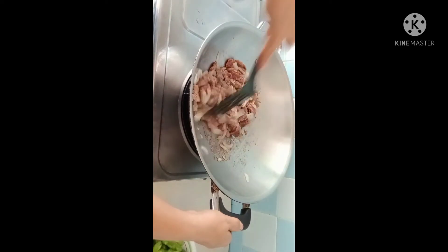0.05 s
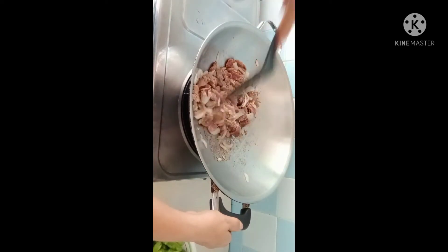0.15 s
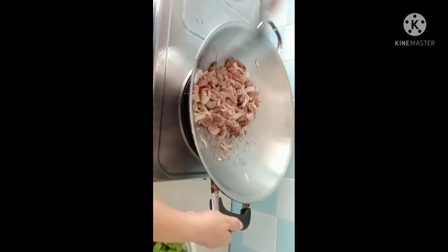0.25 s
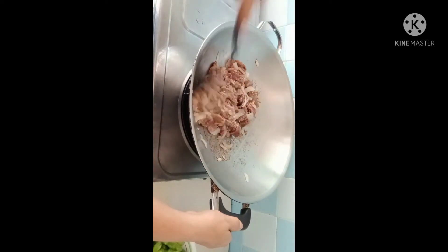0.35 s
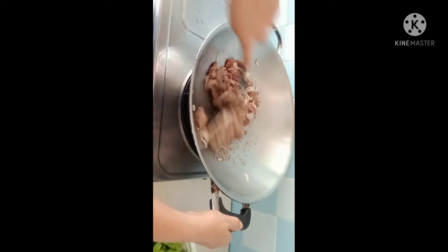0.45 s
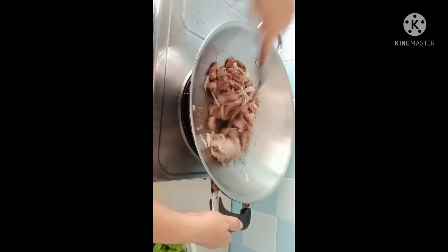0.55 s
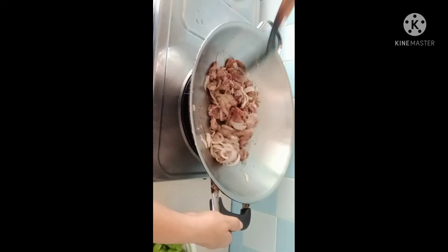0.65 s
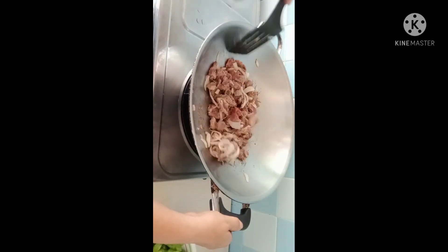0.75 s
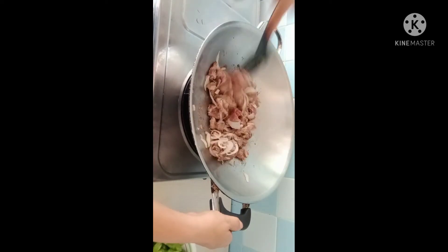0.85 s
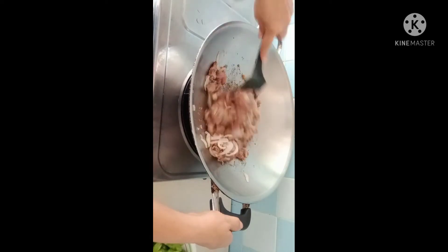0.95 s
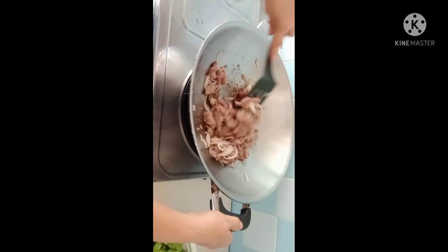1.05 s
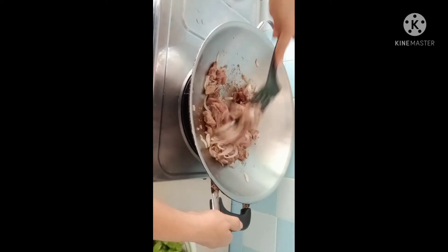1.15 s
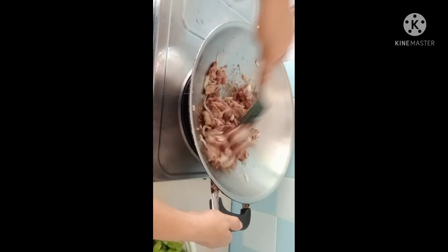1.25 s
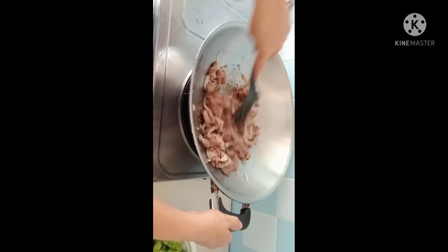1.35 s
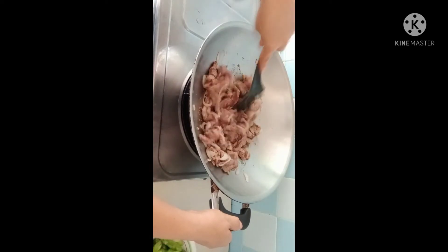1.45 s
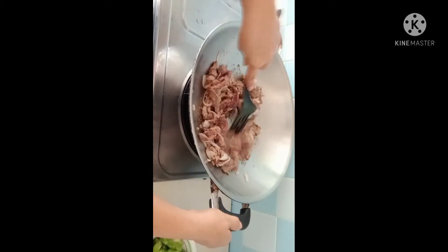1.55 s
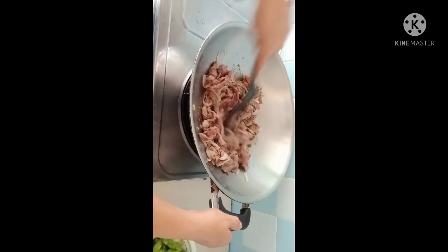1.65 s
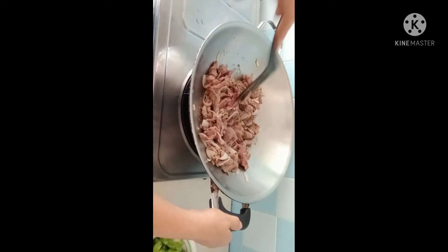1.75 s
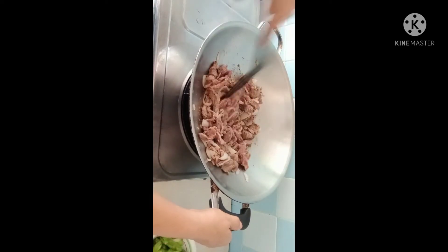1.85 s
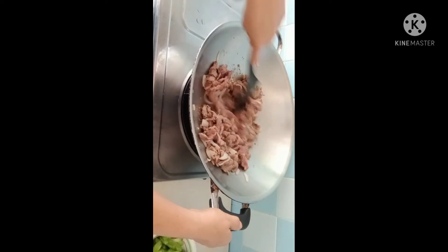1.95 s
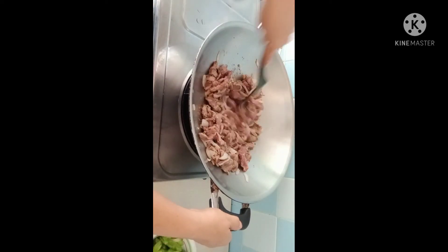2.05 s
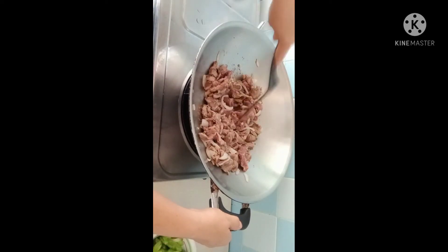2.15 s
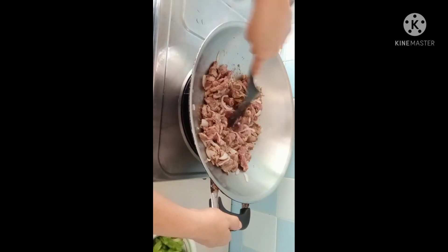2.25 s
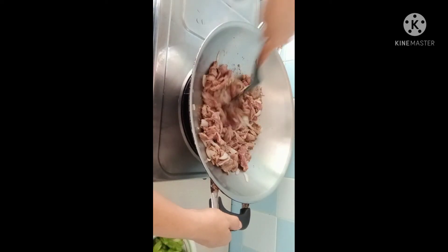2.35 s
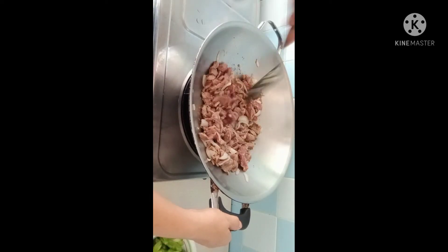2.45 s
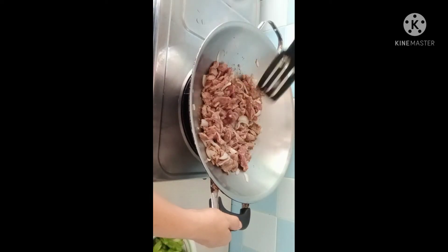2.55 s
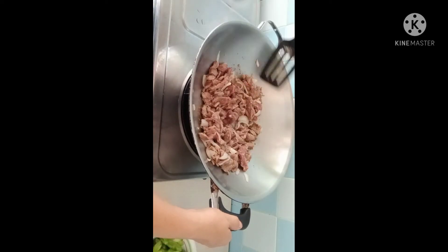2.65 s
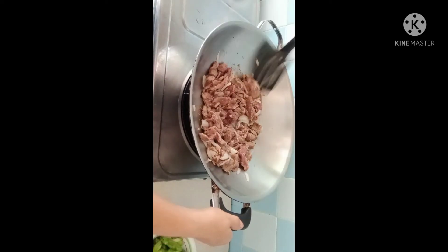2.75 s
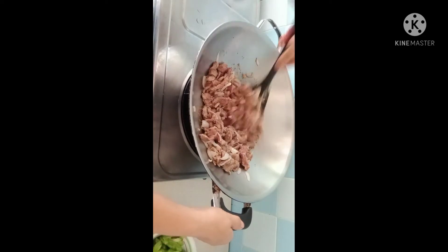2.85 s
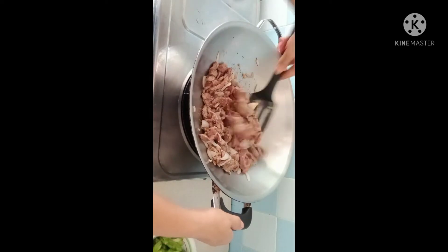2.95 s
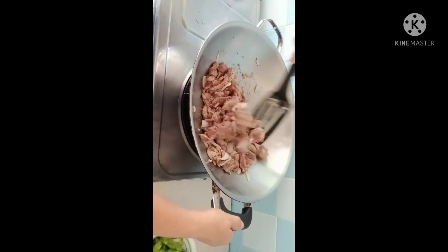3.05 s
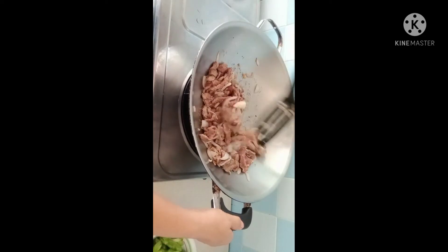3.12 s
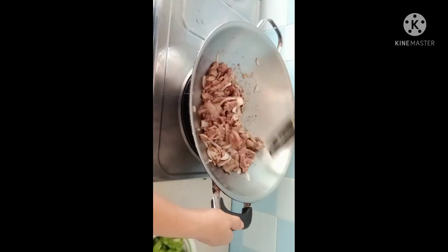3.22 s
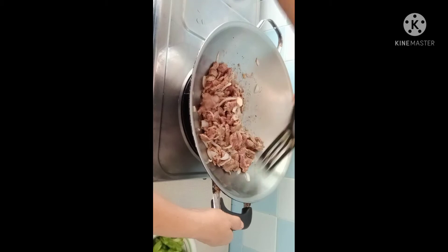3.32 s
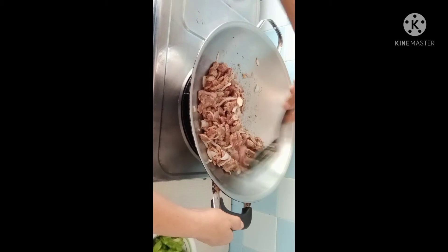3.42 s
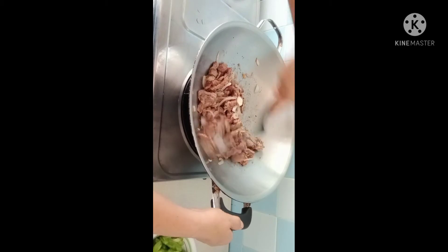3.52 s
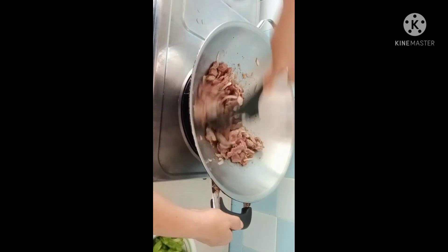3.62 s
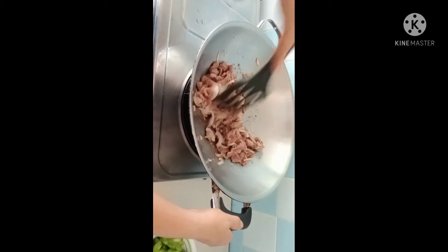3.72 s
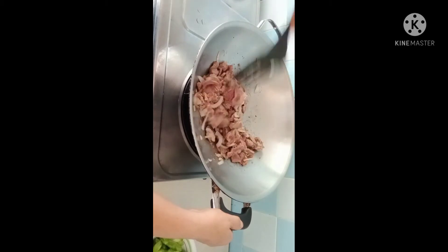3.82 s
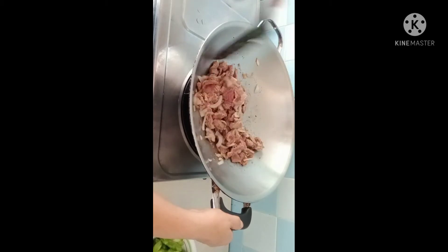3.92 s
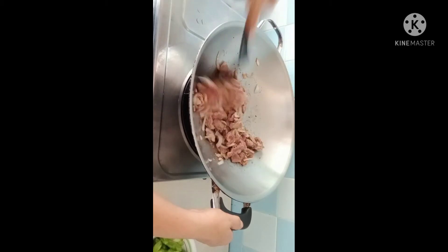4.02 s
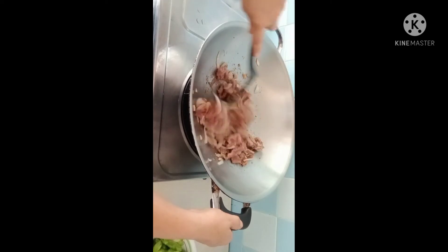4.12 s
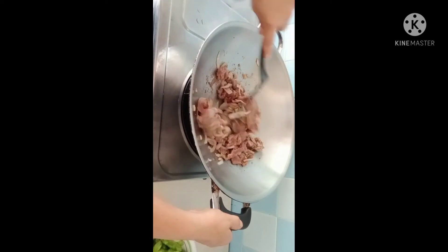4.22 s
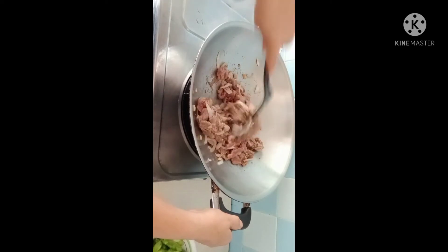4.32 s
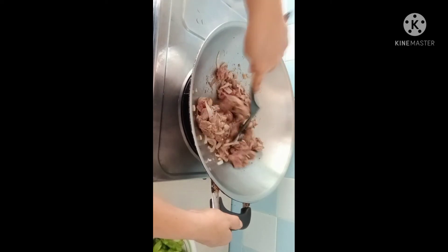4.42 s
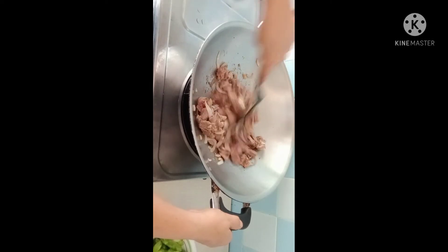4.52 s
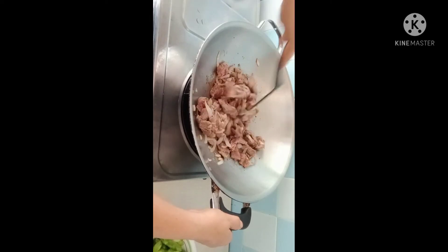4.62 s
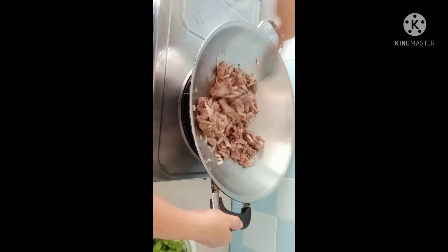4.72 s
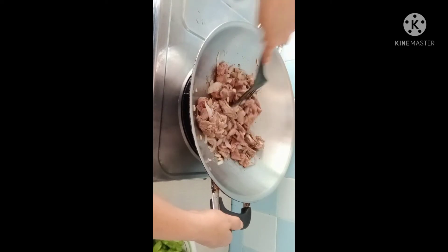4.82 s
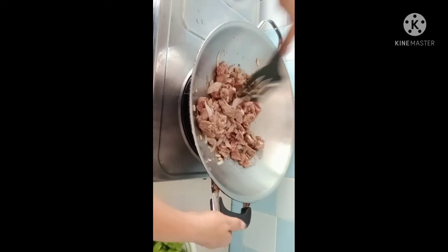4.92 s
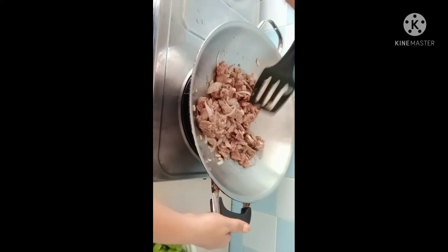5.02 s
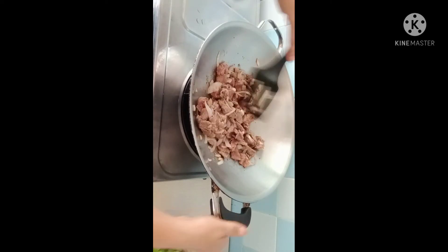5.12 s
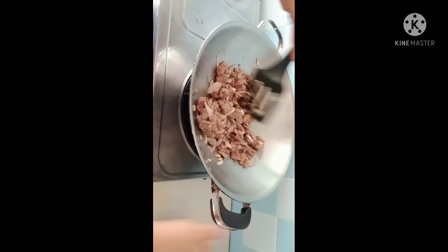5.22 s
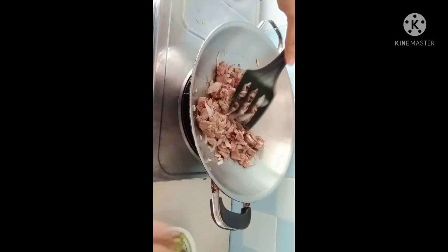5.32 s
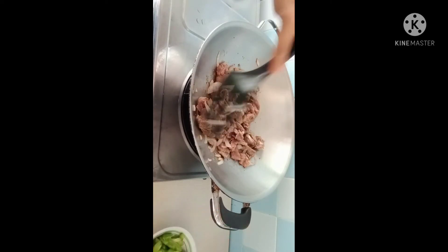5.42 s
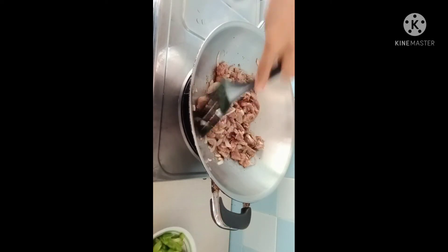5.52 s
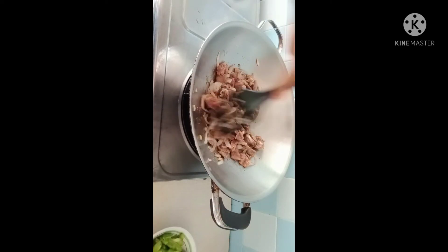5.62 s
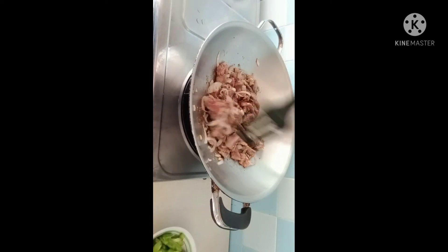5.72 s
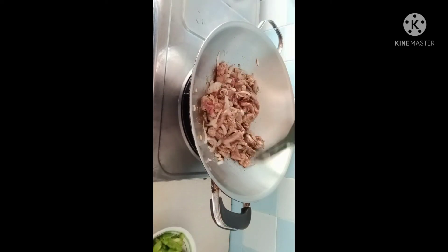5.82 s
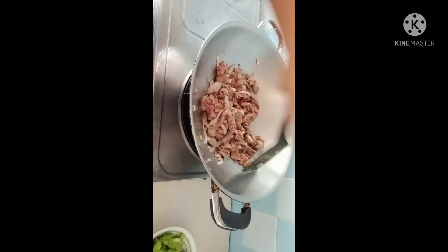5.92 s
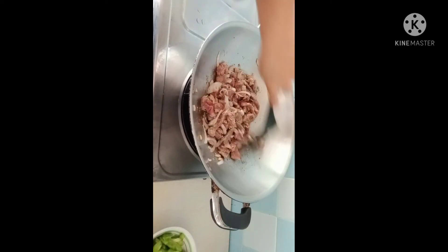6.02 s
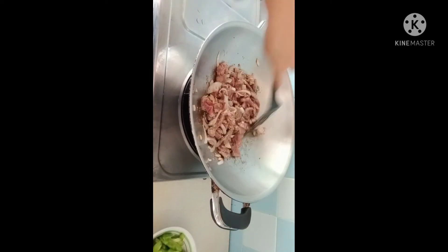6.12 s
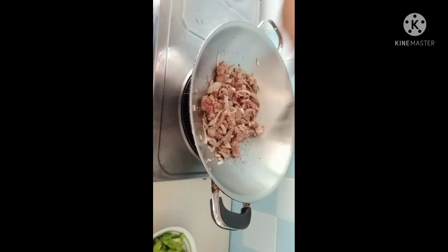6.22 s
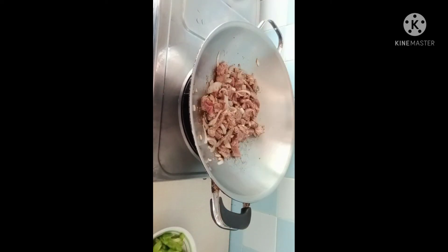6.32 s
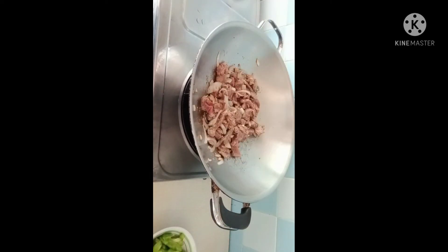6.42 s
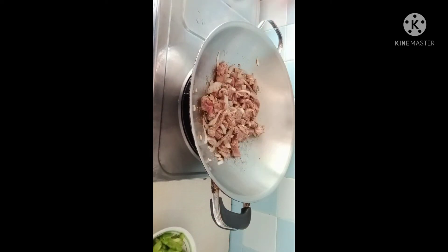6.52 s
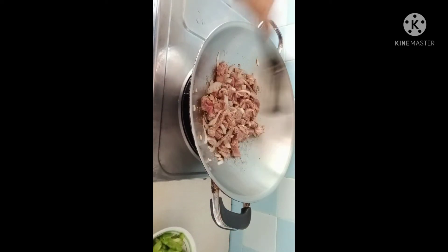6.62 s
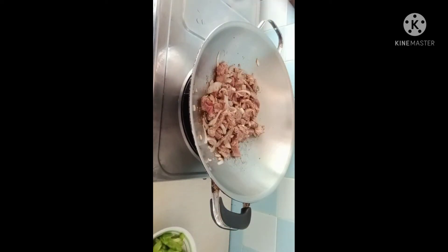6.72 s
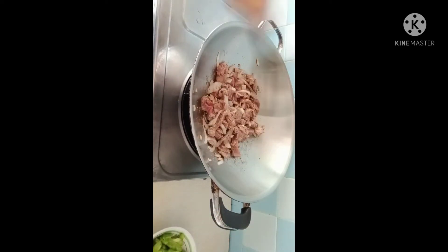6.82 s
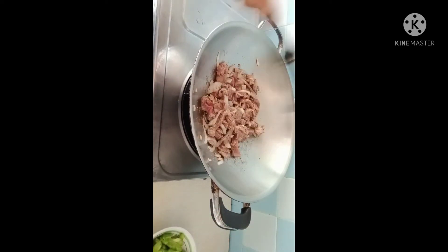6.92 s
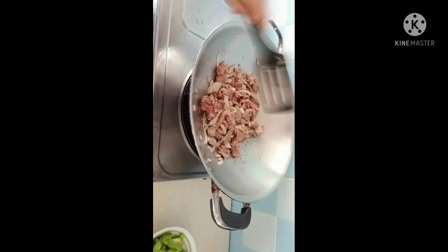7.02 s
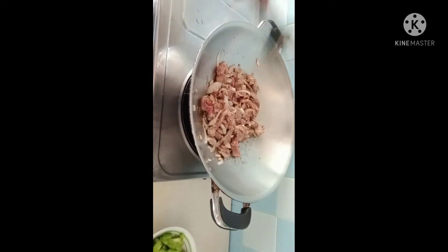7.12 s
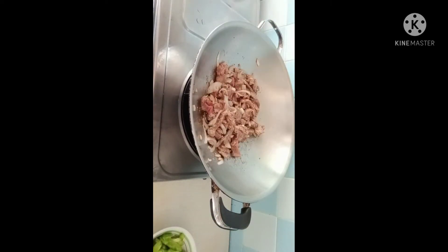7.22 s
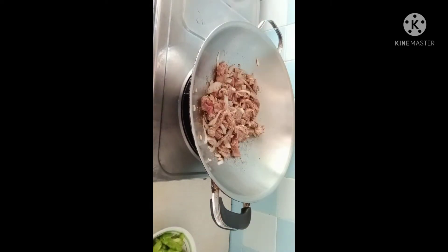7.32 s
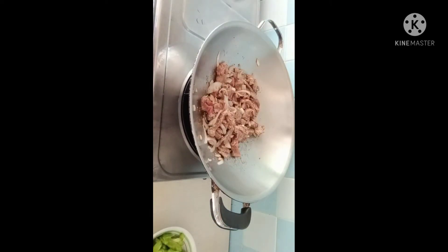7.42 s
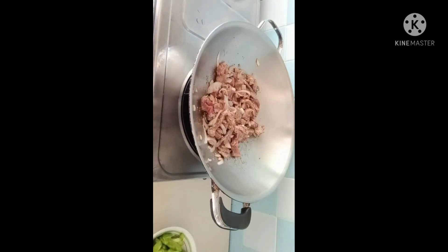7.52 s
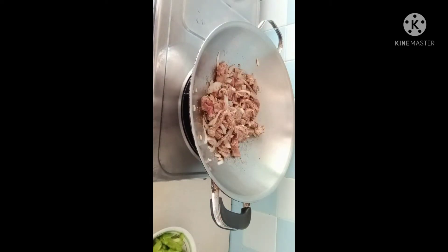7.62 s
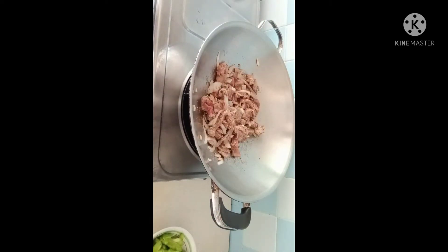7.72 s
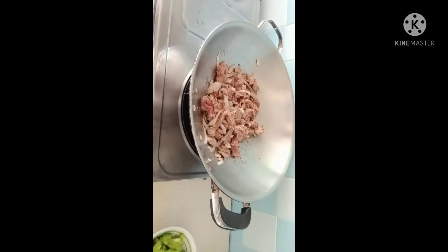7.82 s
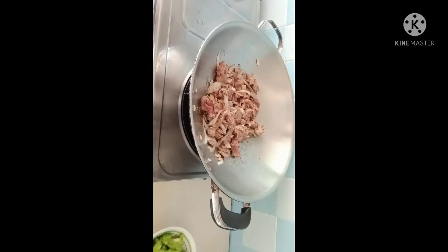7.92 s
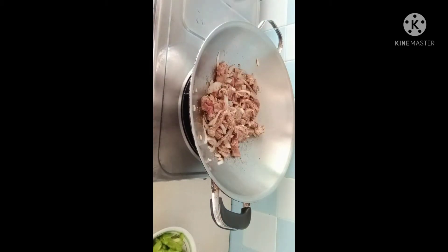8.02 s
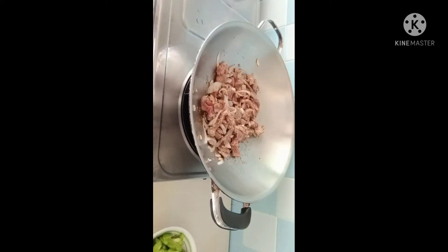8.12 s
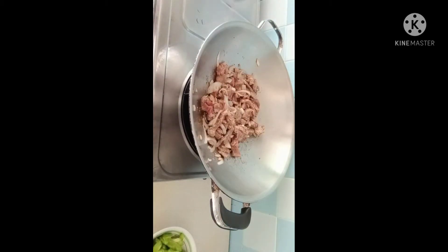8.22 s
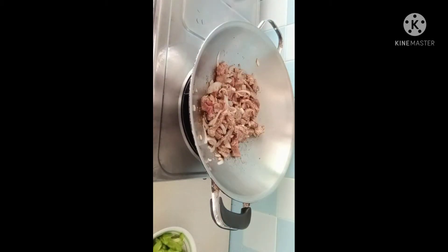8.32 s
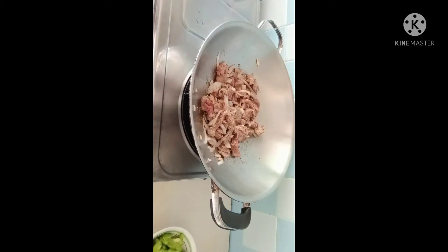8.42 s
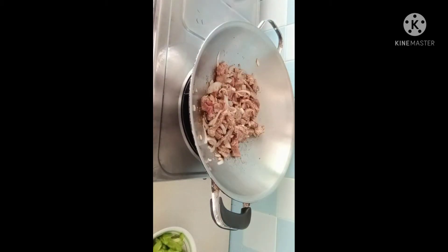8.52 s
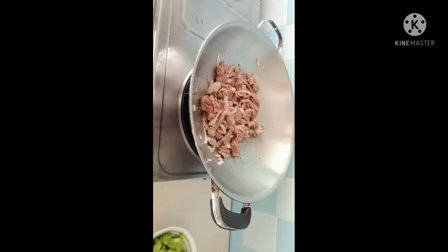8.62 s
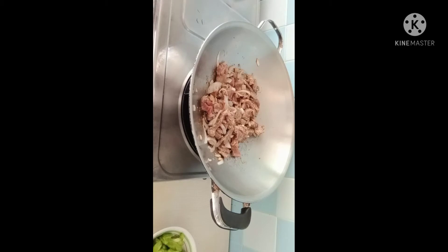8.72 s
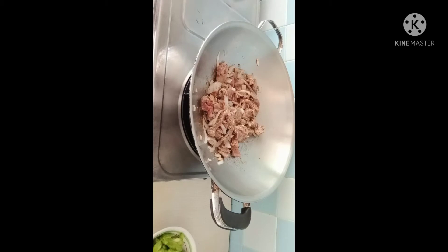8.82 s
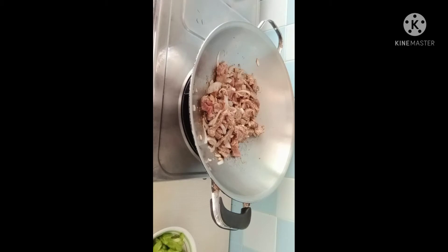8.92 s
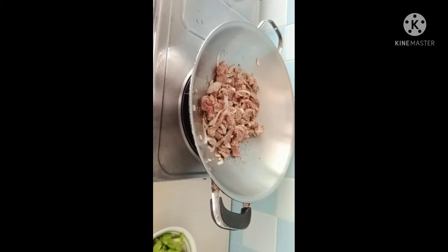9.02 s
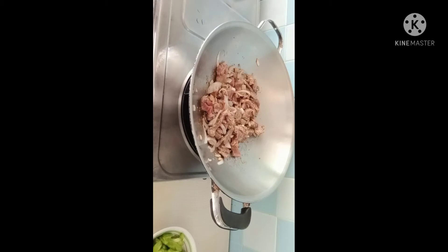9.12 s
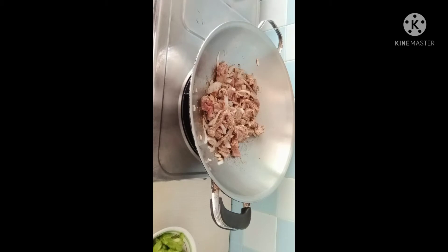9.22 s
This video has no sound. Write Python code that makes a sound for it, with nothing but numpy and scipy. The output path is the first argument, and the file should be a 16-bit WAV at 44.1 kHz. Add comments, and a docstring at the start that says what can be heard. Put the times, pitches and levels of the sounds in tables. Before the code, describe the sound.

A spatula scrapes and clinks against a steel wok over sizzling meat, then clatters down, leaving a faint simmer and a few knocks.

```python
"""Meat is stir-fried in a steel wok, close to a mono phone in a small tiled kitchen.
Motors hum throughout in slowly beating pairs of tones. From the start the spatula scrapes and knocks
the pan, each time setting off a beating ring near 1250 Hz, and fat gushes into sizzle and spits as the
food is turned. Around 6 s the spatula is laid down with a clatter and the frying sinks to a faint
simmer. From 8 s on, things are shifted on the stove top with knocks and dull bumps."""
import sys
import numpy as np
from scipy import signal
from scipy.fft import rfft, irfft, next_fast_len
from scipy.io import wavfile

SR = 44100
rng = np.random.default_rng(int(sys.argv[2]) if len(sys.argv) > 2 else 0)


def output_pcm(signal):
    """Save a mono or channel-first signal as 16-bit PCM at the path in sys.argv[1].

    Samples are clipped to [-1, 1] before scaling.
    """
    pcm = np.clip(np.atleast_2d(signal).T, -1, 1) * 32767
    wavfile.write(sys.argv[1], SR, np.round(pcm).astype(np.int16))


N = 408366
TIME = np.arange(N) / SR

# motor tones; close pairs beat and swell together at crest_s: pitch_hz, level_db, crest_s
MOTOR_TONES = [(100.04, -71.3, .298), (97.35, -73, .298), (106.3, -79.4, 0), (120.77, -81.7, 0),
               (200.09, -73, 0), (235.97, -69.3, .11), (230.28, -71.8, .11), (250.99, -77.7, 0)]
# tone colour of the room air: frequency_hz, level_db
AIR_SPECTRUM = [(18, -51.5), (30, -13), (43, -19), (96, -9.5), (150, -11.5), (225, -7), (345, -16.5),
                (1070, -19.5), (1260, -12), (1410, -20), (2500, -17.5), (3250, -16), (5500, -120)]
# dull bumps carried through the stove: start_s, level_db, pitch_hz
STOVE_BUMPS = [(0.459, -44.5, 237.5), (0.859, -48, 156.7), (0.929, -43.5, 119), (3.791, -51, 231),
               (4.028, -47, 111), (4.038, -48, 227.8), (6.03, -44, 320), (6.081, -45, 253.5),
               (7.125, -55, 205), (7.149, -55, 129), (8.069, -52, 256.5), (8.111, -49, 102),
               (8.711, -42.5, 232), (8.79, -46.5, 110.6), (8.858, -38, 241), (8.891, -38.5, 280),
               (9.048, -52, 244)]
# modes of the wok's bowl and its rim: pitch_hz, level_db, t60_s
BOWL_MODES = [(305.1, 3, 0.15), (353, 0, 0.051), (414.3, 2.5, 0.32), (443.7, 0, 0.18), (508, 0.5, 0.19),
              (550, -5.5, 0.34), (595.7, 0.5, 0.3), (660.6, 7, 0.065), (758.6, 0, 0.13), (824, 1, 0.24),
              (897, 6.5, 0.05), (968, 2.5, 0.092), (1070, -6.5, 0.21)]
RIM_MODES = [(1670, 6, 0.16), (1883, 3, 0.157), (2043, 7.5, 0.16), (2384, 2.5, 0.15), (2820, -0.5, 0.089),
             (2964, 1.5, 0.061), (3107, -1, .1), (3450, -4.5, 0.11), (3784.4, -1.5, 0.21),
             (4264, -1, 0.097), (4100, -4.5, 0.13), (4550, -4, 0.118), (4663, -3, 0.3), (4730, -7, 0.194),
             (5100, -4, 0.14), (5470, -1, 0.1), (5880, 0.5, 0.13), (7030, 5, 0.16), (7370, 4, 0.1)]
# a beating ring near 1250 Hz that every knock and scrape sets off: pitch_hz, level_db, t60_s
NEAR_RING_MODES = [(1099, -15, 0.15), (1234, -1, 0.3), (1269, 0, 0.36), (1295, -6, 0.13), (1353, -12, 0.25)]
# hits on steel: start_s, clink_db, clink_a_hz, clink_b_hz, thud_db, thud_hz, ring_db,
# decay_share (how much of the wok's decay time food and hand leave)
STEEL_HITS = [(0.1351, -40, 2600, 3800, -60, 430, -54, .3), (0.1965, -35, 2960, 3800, -66, 430, -65, .3),
              (0.352, -31, 4440, 5350, -46.5, 400, -57.5, 0.39), (0.4, -37, 1910, 4480, -69, 430, -58, .4),
              (0.4441, -32, 3130, 2800, -51, 397, -46, 0.5), (0.459, -38, 3100, 4050, -57.5, 430, -52, .4),
              (0.8199, -27.5, 4520, 5440, -59, 427, -50, 0.3),
              (0.829, -39.5, 3800, 5850, -63, 433, -66, 0.77), (0.84, -37, 4600, 5860, -68, 428, -66, 0.77),
              (0.9078, -42, 2253, 3460, -57, 430, -58.5, .5),
              (1.3002, -46, 5780, 3800, -68.5, 430, -64, 0.3), (1.5048, -37, 3070, 3800, -59, 430, -61, .4),
              (2.749, -28.5, 3070, 4450, -57, 433, -53, 0.3),
              (2.847, -37.5, 2880, 3750, -56, 540, -42, 0.66),
              (3.3349, -21.5, 2700, 4180, -29, 404, -44.5, 0.4),
              (3.3365, -28.5, 1870, 4900, -42, 760, -52, 0.163),
              (3.5663, -41, 2770, 5580, -36, 676, -65, 1), (3.9888, -28, 4180, 4920, -48, 442, -56, 0.36),
              (4.0397, -35.5, 2010, 2400, -43.5, 574, -53.5, 0.34),
              (4.054, -39, 3110, 4270, -53, 430, -56, .6), (4.078, -39, 3110, 3800, -64, 430, -54, .5),
              (4.5909, -42.5, 3040, 3800, -58, 428, -55.5, .4),
              (4.975, -39.5, 3780, 4650, -68, 430, -73, 0.23),
              (5.4145, -38.5, 2750, 3440, -64, 430, -60.5, 0.4),
              (5.5174, -34.5, 2930, 5820, -56.5, 395, -71, 0.44),
              (5.538, -38, 4650, 2950, -61, 430, -66, 0.45), (5.571, -41, 2720, 4500, -51, 460, -58.5, 0.7),
              (5.606, -37, 3800, 2950, -65, 430, -58.5, 0.47),
              (5.7801, -44, 2950, 4650, -70, 430, -61, .15),
              (5.9671, -31, 2683, 4240, -24.5, 510, -35.5, 0.22),
              (5.976, -40.5, 3800, 4500, -30, 495, -37, 0.61),
              (6.0034, -46.5, 2330, 3800, -34, 523, -39, 0.39),
              (6.0254, -46.5, 2330, 4000, -38, 416, -53.5, 0.3),
              (6.055, -54, 2330, 4100, -42, 398.4, -50, 0.43),
              (6.0887, -60, 2330, 4100, -48.5, 324, -54, 0.41),
              (7.124, -55, 3080, 5180, -59, 325, -70.5, 0.8),
              (7.151, -62, 2080, 3800, -51, 471.8, -78, 0.48), (8.07, -54, 1690, 2380, -54, 553, -60, 0.55),
              (8.639, -43, 1860, 2390, -43, 600, -34, 0.537),
              (8.668, -43.5, 1690, 2400, -37, 478, -24.5, 0.63),
              (8.828, -53, 2063, 3780, -43, 555, -57, .9), (8.866, -44.5, 2090, 2380, -42, 555, -39, 0.52),
              (9.016, -42, 3040, 3740, -50, 470, -61, 0.29)]
# scrapes by the spatula, later by things shifted on the stove:
# start_s, rise_s, hold_s, hiss_db, treble_db, bowl_db, ring_db, bowl_centre_hz
STROKES = [(0.0, 0.034, 0.074, -42.5, -50, -64, -49, 800),
           (0.324, 0.025, 0.1265, -43, -49.5, -59, -49.5, 700),
           (0.404, 0.03, 0.016, -40, -66, -63, -49, 570), (0.805, .01, 0.095, -51, -55, -62, -66, 400),
           (0.892, 0.0314, 0.043, -54, -58, -63, -55, 860),
           (1.37, 0.11, 0.027, -43, -47.5, -57, -50.5, 850), (1.908, .01, 0.1, -48.5, -65, -69, -57, 840),
           (2.364, 0.07, 0.0254, -45.5, -51, -62, -55, 780),
           (2.735, 0.018, 0.14, -48.5, -59, -54, -48.5, 740),
           (3.325, 0.0077, 0.071, -45, -66, -46.5, -53, 610),
           (3.452, 0.031, 0.26, -45, -49.5, -57, -56, 860), (3.553, 0.0114, 0.058, -61, -50, -48, -49, 680),
           (3.638, 0.056, 0.019, -44, -62, -68, -47, 900),
           (3.98, 0.0088, .04, -47.5, -47.5, -57, -55.5, 700),
           (4.015, 0.0154, 0.063, -44, -47.5, -54, -48, 705), (4.417, 0.03, .01, -58, -57, -67, -67.5, 500),
           (4.536, 0.067, 0.034, -45.5, -49, -59.5, -52, 670),
           (4.848, 0.024, 0.036, -62, -75, -80, -59, 600),
           (5.508, 0.0137, 0.037, -49.5, -59, -57, -55, 790),
           (5.56, 0.0071, 0.018, -42.5, -48, -66, -54, 830),
           (5.959, 0.0057, 0.032, -48.5, -67, -42.5, -48, 500),
           (6.015, 0.0182, 0.0164, -51.5, -53.5, -51, -57, 380),
           (6.467, 0.029, 0.073, -64, -79, -79, -82, 600), (7.114, 0.027, .01, -64, -64, -74, -81, 800),
           (8.635, 0.017, 0.054, -52, -75, -47.5, -43, 830),
           (8.814, 0.015, 0.066, -53, -81.5, -47.5, -48.5, 597),
           (8.995, 0.019, 0.073, -58.5, -69, -68, -63, 460)]
# lone spits of fat: start_s, level_db, pitch_hz
FAT_SPITS = [(1.4677, -28, 3110), (1.653, -25, 4020), (1.93, -32, 3110), (2.2412, -26.5, 4000),
             (2.4196, -27.5, 3200), (2.599, -28, 3980), (3.048, -35, 3290), (3.1087, -36, 3940),
             (3.1945, -36, 3060), (3.4894, -38, 7270), (4.2207, -41, 3030), (4.4291, -33, 3780),
             (5.456, -37, 3700), (5.5706, -34, 7620), (5.781, -30, 9900), (6.085, -25, 10350),
             (7.3766, -40, 2980)]
# bed of steady frying, higher while fresh food meets hot steel: time_s, level_db
SIMMER_LEVELS = [(0, -43), (.3, -45.5), (.6, -52), (1.27, -55), (1.33, -46), (2.0, -46.5), (2.7, -48.5),
                 (3.3, -50.5), (3.9, -48.5), (4.3, -54), (4.75, -52), (5.5, -54), (5.8, -56.5), (6.5, -58),
                 (7.3, -62), (9.26, -61.5)]
# tone colour of the sizzle: frequency_hz, level_db
SIZZLE_SPECTRUM = [(820, -37), (1400, -1.5), (1730, -2), (2400, -0.5), (2630, -1), (3050, -1), (3690, 0),
                   (4460, -4.5), (5610, -3.5), (6330, -12.5), (7430, -9.5), (8130, -13), (9730, -7.5),
                   (13500, -21), (15200, -13)]
# how the bowl hollows the steady frying: frequency_hz, gain_db
BOWL_HOLLOW = [(1400, -5), (1950, -1.5), (2260, -5), (2420, -1), (2600, -4.5), (2800, 0), (3350, -0.5),
               (3750, 0), (4050, 1), (4300, -0.5), (5150, -0.5), (5550, 0), (5950, 0.5), (6100, -2)]

RISE_DB, HISS_FADE_DB_S, STEEL_FADE_DB_S = 20, 179, 133  # a scrape's climb; its fall after the hold
SIMMER_TREBLE_DB, SIMMER_BOWL_DB, SIMMER_RING_DB = -4.5, -17, -11  # sends from the frying bed
ROOM_T60_S, ROOM_DB = .22, -7


def undb(db):
    return 10 ** (np.asarray(db) / 20)


def unit(x):
    return x / np.sqrt(np.mean(x ** 2))


def add(out, x, start_s):
    i = int(start_s * SR)
    out[i:i + len(x)] += x[:len(out) - i]


def band(x, lo_hz, hi_hz):
    return signal.sosfilt(signal.butter(2, [lo_hz, hi_hz], "band", fs=SR, output="sos"), x)


def colour(x, spectrum, lo_hz=0., hi_hz=SR):
    """EQ through (frequency_hz, level_db) points, silent outside the band."""
    size = next_fast_len(len(x))
    hz = np.arange(size // 2 + 1) * SR / size + 1e-3
    points_hz, points_db = np.transpose(spectrum)
    gain = undb(np.interp(np.log(hz), np.log(points_hz), points_db))
    return irfft(rfft(x, size) * gain * (hz >= lo_hz) * (hz < hi_hz), size)[:len(x)]


def wobble(spread_db, rate_hz):
    """A gain that wanders between random levels."""
    count = int(N / SR * rate_hz) + 2
    return np.interp(TIME * rate_hz, np.arange(count), undb(spread_db * rng.standard_normal(count)))


def crackle(per_s, spread_db):
    """Random clicks, many small and a few large."""
    when, sign, size = rng.random((3, N))
    return unit((when < per_s / SR) * np.sign(sign - .5) * undb(-spread_db * np.log(1.02 - size)))


def nearness(hz, centre_hz, octaves):
    return np.exp(-.5 * (np.log2(hz / centre_hz) / octaves) ** 2)


def resonate(force, modes, decay_share, shift_db, centre_hz=None, octaves=1.):
    """A running force rings the modes; their balance shifts as the contact moves."""
    out, power = 0, 0
    for hz, db, t60 in modes:
        radius = np.exp(-np.log(1000) / (t60 * decay_share * SR))
        poles = [1, -2 * radius * np.cos(2 * np.pi * hz / SR), radius ** 2]
        ring = signal.lfilter([1, 0, -1], poles, force * wobble(shift_db, 9))
        gain = undb(db) * (1 if centre_hz is None else nearness(hz, centre_hz, octaves))
        out += gain * np.sqrt(1 - radius) * ring
        power += gain ** 2
    return unit(out / np.sqrt(power))


def strike(modes, centres_hz, octaves, decay_scale, jitter, contact_s=.00042):
    """One blow: modes near the centres ring most; a longer contact softens the attack."""
    hz, db, t60 = np.transpose(modes)[:, :, None]
    t = np.arange(int(.4 * SR)) / SR
    near = sum(nearness(hz, centre, octaves) for centre in centres_hz)
    gain = undb(db + 1.5 * jitter[:len(modes), None]) * near
    rings = gain * np.exp(-np.log(1000) * t / (t60 * decay_scale)) * np.sin(2 * np.pi * hz * t)
    return (1 - np.exp(-t / contact_s)) * np.sum(rings, axis=0) / np.sqrt(np.sum(gain ** 2))


def layer_power(simmer_db, scrapes_db, fade_db_s):
    """Power envelopes: a row for the frying bed, then one per scrape (rise, hold, fade)."""
    start, rise, hold = np.transpose(STROKES)[:3, :, None]
    age = TIME - start
    shape_db = RISE_DB * np.minimum(age / rise - 1, 0) - fade_db_s * np.maximum(age - rise - hold, 0)
    bed = undb(np.interp(TIME, *np.transpose(SIMMER_LEVELS)) + simmer_db)
    return np.vstack([bed, (age >= 0) * undb(scrapes_db[:, None] + shape_db)]) ** 2


def layer_gain(simmer_db, scrapes_db, fade_db_s):
    return np.sqrt(np.sum(layer_power(simmer_db, scrapes_db, fade_db_s), axis=0))


def room_tone():
    """Wavering motor tones over a low rush of air."""
    hum = sum(undb(db) * np.sqrt(2) * wobble(3.3, 8) * np.cos(2 * np.pi * hz * (TIME - crest_s))
              for hz, db, crest_s in MOTOR_TONES)
    air = undb(-62) * wobble(1.76, 7.9) * unit(colour(rng.standard_normal(N), AIR_SPECTRUM))
    return hum + air


def tile_reverb(blows):
    """Tiled walls answer each blow with a dense tail, pre-delayed by 4 ms."""
    t = np.arange(SR // 2) / SR
    tail = rng.standard_normal(len(t)) * np.exp(-np.log(1000) * t / ROOM_T60_S) * (t > .004)
    return undb(ROOM_DB) * signal.fftconvolve(blows, tail / np.sqrt(np.sum(tail ** 2)))[:N]


def bumps():
    """A soft push on the stove rings one low mode for a few cycles."""
    out, t = np.zeros(N), np.arange(SR // 4) / SR
    envelope = (1 - np.exp(-t / .00042)) * np.exp(-t / .018)
    for start_s, db, hz in STOVE_BUMPS:
        add(out, undb(db) * np.sin(2 * np.pi * hz * t) * envelope, start_s)
    return out


def knocks(longest_free_s=.095, settle_s=.008):
    """Two stems: the wok's crack, rim clink and bowl thud, and the beating ring near 1250 Hz."""
    wok, near_ring = np.zeros((2, N))
    t = np.arange(int(.4 * SR)) / SR
    noises = rng.standard_normal((len(STEEL_HITS), 800))
    gaps_s = np.diff(np.transpose(STEEL_HITS)[0], append=np.inf)
    for hit, noise, gap_s in zip(STEEL_HITS, noises, gaps_s):
        start_s, clink_db, clink_a_hz, clink_b_hz, thud_db, thud_hz, ring_db, decay_share = hit
        crack = undb(clink_db - 7) * band(noise, 1300, 7000) * np.exp(-t[:len(noise)] / .004)
        clink = undb(clink_db) * strike(RIM_MODES, (clink_a_hz, clink_b_hz), .08, decay_share, noise)
        thud = undb(thud_db) * strike(BOWL_MODES, (thud_hz, 1.82 * thud_hz), .075, decay_share, noise[30:])
        add(wok, crack, start_s)
        add(wok, clink + thud, start_s)
        ring = strike(NEAR_RING_MODES, [1260], 1, decay_scale=1.4, jitter=noise[50:], contact_s=.002)
        # the ring is choked after a moment, or by the next hit
        choke = np.exp(-np.maximum(t - min(gap_s, longest_free_s), 0) / settle_s)
        add(near_ring, undb(ring_db) * ring * choke, start_s)
    return band([wok, near_ring], 220, 13000)  # thin steel radiates little below its lowest mode


def scraping(simmer_centre_hz=630):
    """Stick-slip jolts drum the bowl and set off the ring; the loudest scrape steers the bowl's tone."""
    bowl_db, ring_db, centres_hz = np.transpose(STROKES)[5:]
    powers = layer_power(SIMMER_BOWL_DB, bowl_db, STEEL_FADE_DB_S)
    total = np.sum(powers, axis=0)
    centre_hz = np.append(simmer_centre_hz, centres_hz) @ powers / total
    jolts = crackle(per_s=1500, spread_db=2.26)
    bowl = resonate(band(jolts, 224, 1490), BOWL_MODES, .85, shift_db=5, centre_hz=centre_hz, octaves=.75)
    near_ring = resonate(band(jolts, 1020, 1460), NEAR_RING_MODES, .4, shift_db=2.5)
    return np.sqrt(total) * bowl + layer_gain(SIMMER_RING_DB, ring_db, STEEL_FADE_DB_S) * near_ring


def spits():
    """A droplet of fat bursts: a snap and a ring of two or three cycles."""
    out, t = np.zeros(N), np.arange(300) / SR
    for start_s, db, hz in FAT_SPITS:
        snap = .153 * np.cos(2 * np.pi * hz * t) * np.exp(-t / .0001)
        ring = np.sin(2 * np.pi * hz * t) * np.exp(-t * hz / 2.2)
        add(out, undb(db) * (snap + ring), start_s)
    return out


def pings(count, t60_s, spread_db):
    """Tiny bubbles and droplets, each ringing briefly at its own pitch."""
    start, pitch, size = rng.random((count, 3)).T[:, :, None]
    k = np.arange(1100)
    hz = 1400 + 14000 * pitch
    envelopes = undb(-spread_db * np.log(1.02 - size)) * np.exp(-np.log(1000) * k / SR / t60_s)
    rings = envelopes * np.sin(2 * np.pi * hz * k / SR)
    positions = (start * N).astype(int) + k
    return unit(np.bincount(positions.ravel(), rings.ravel())[:N])


def frying_texture():
    """Steam hiss and bursting fat as body and treble; bands share snaps and pings but flicker alone."""
    shared = .8 * crackle(per_s=5000, spread_db=3.8) + pings(count=6500, t60_s=.075, spread_db=1.9)
    fine_snaps = crackle(per_s=2000, spread_db=2.6)
    shared += .2 * crackle(per_s=45, spread_db=5.3)  # sparse, sharp snaps
    edges_hz = 1400 * 2 ** np.arange(0, 3.7, .24)
    body, treble = np.zeros((2, N))
    for lo_hz, hi_hz in zip(edges_hz[:-1], edges_hz[1:]):
        grain = rng.standard_normal(N) + shared + .83 * np.roll(fine_snaps, rng.integers(N))
        flicker = wobble(1.55, 25) if lo_hz < 13000 else wobble(3, 14)
        stem = body if lo_hz < 6000 else treble
        stem += flicker * colour(grain, SIZZLE_SPECTRUM, lo_hz, hi_hz)
    return unit(body), unit(treble)


def sizzle(bed_rim_db=-8, gush_rim_db=-6.5):
    """A hollow bed of frying and a gush with each scrape, both tinged by the ringing rim."""
    hiss_db, treble_db = np.transpose(STROKES)[3:5]
    body, treble = frying_texture()
    rim = resonate(crackle(1500, 2.8), RIM_MODES, .5, shift_db=4, centre_hz=4000, octaves=.5)
    bed = np.roll(body + undb(bed_rim_db) * rim, SR)  # offset decorrelates it from the gushes
    bed = unit(colour(bed, BOWL_HOLLOW))
    gush = unit(body + undb(gush_rim_db) * rim)
    powers = layer_power(0, hiss_db, HISS_FADE_DB_S)
    return (np.sqrt(powers[0]) * bed + np.sqrt(np.sum(powers[1:], axis=0)) * gush
            + layer_gain(SIMMER_TREBLE_DB, treble_db, HISS_FADE_DB_S) * treble)


def scene():
    """Mono mix; only the short blows feed the reverb."""
    wok, near_ring = knocks()
    blows = wok + spits() + bumps()
    mono = tile_reverb(blows) + blows + near_ring + sizzle() + scraping() + room_tone()
    return np.array([mono, mono])


def record(dry):
    """The phone rolls off the bass and cuts the top."""
    low_cut = signal.butter(2, 53, "high", fs=SR, output="sos")
    high_cut = signal.ellip(12, .2, 80, 15450, fs=SR, output="sos")
    return signal.sosfilt(high_cut, signal.sosfilt(low_cut, dry))


dry = scene()
out = record(dry)
output_pcm(out)
```